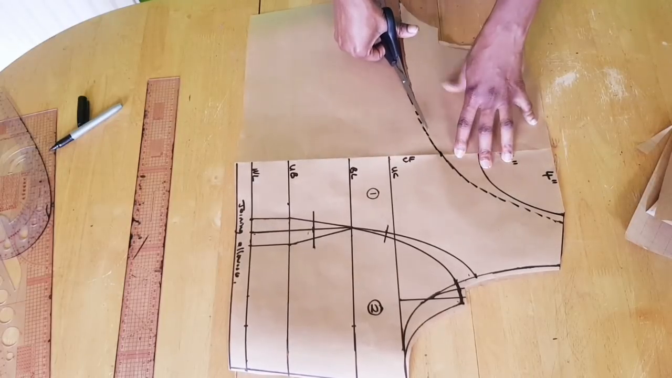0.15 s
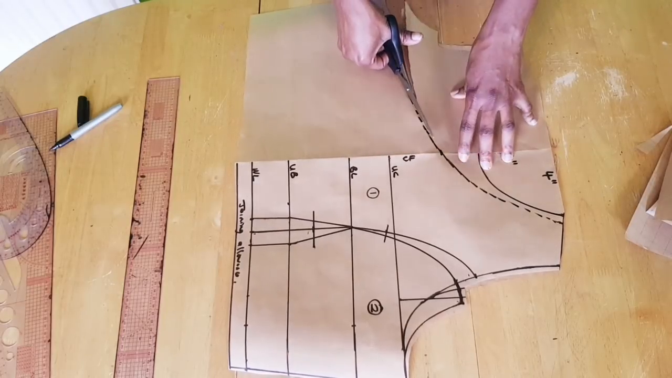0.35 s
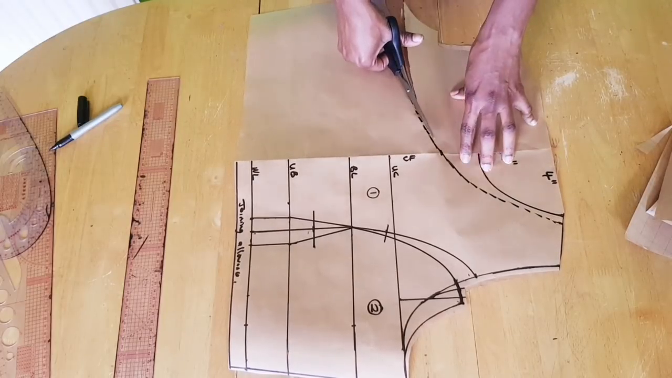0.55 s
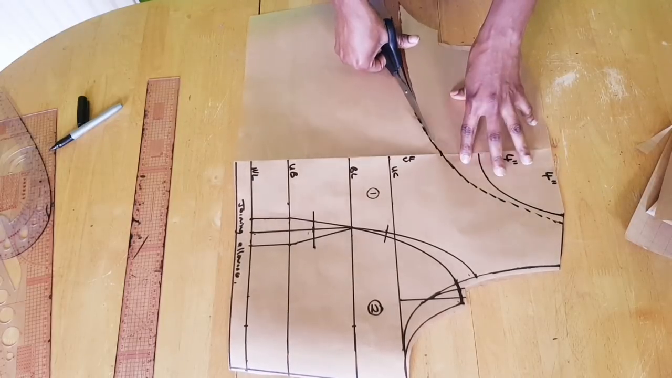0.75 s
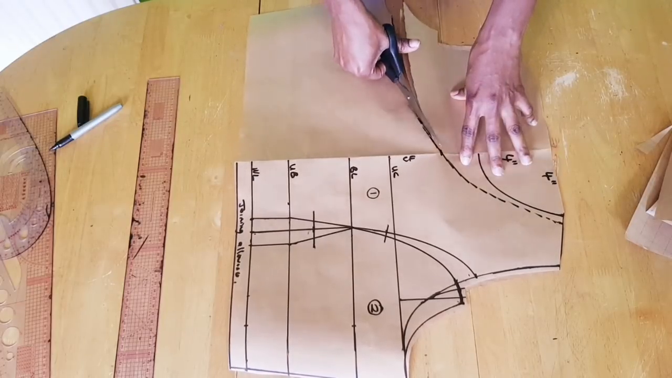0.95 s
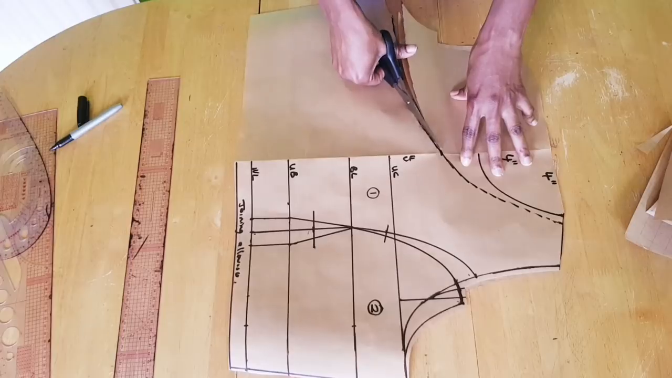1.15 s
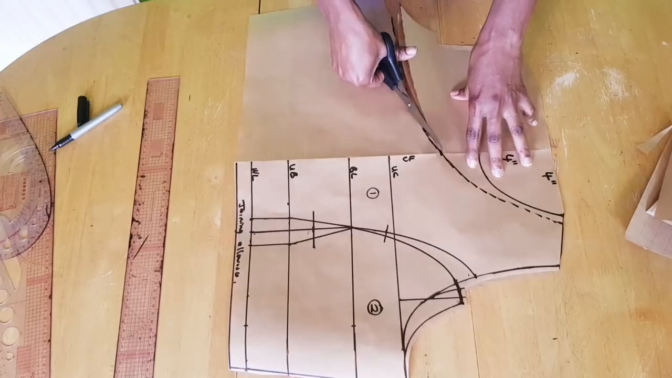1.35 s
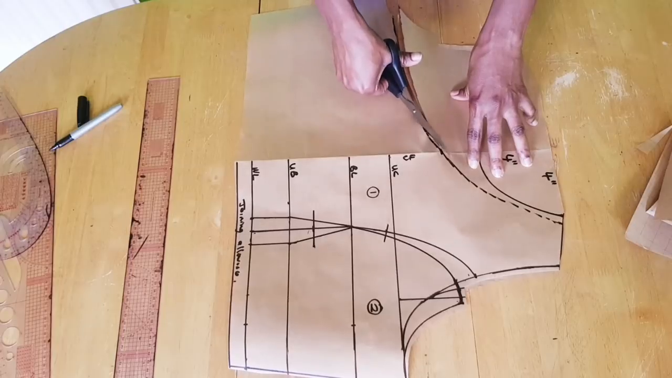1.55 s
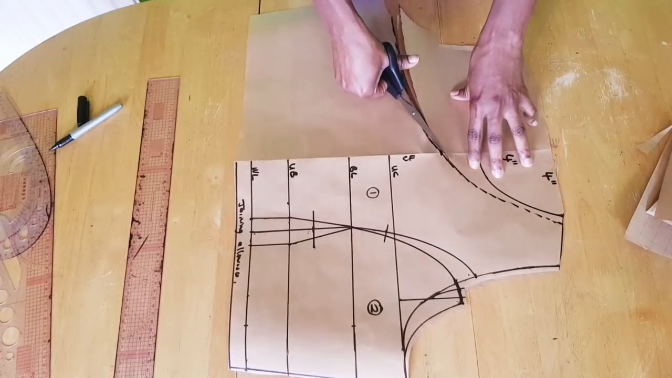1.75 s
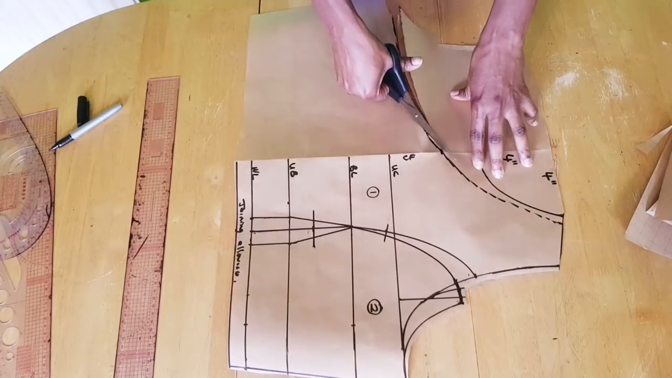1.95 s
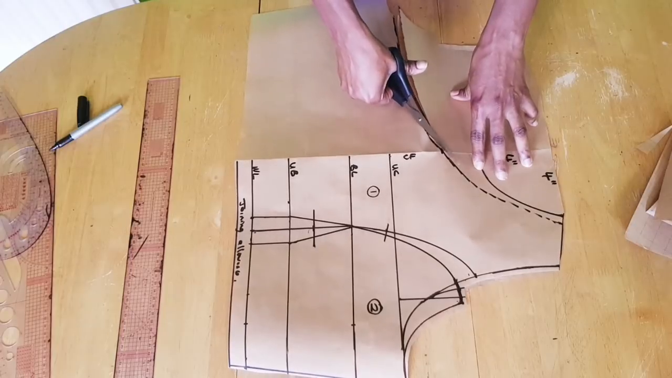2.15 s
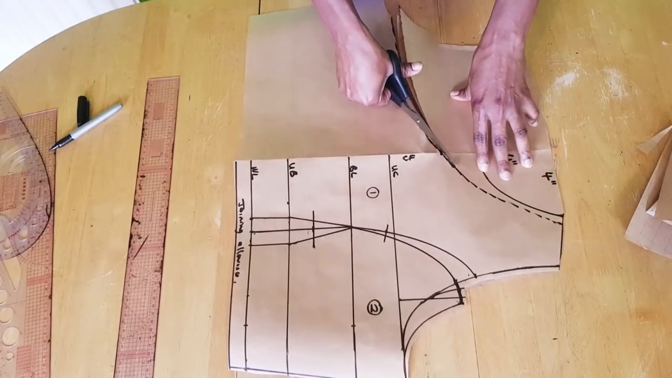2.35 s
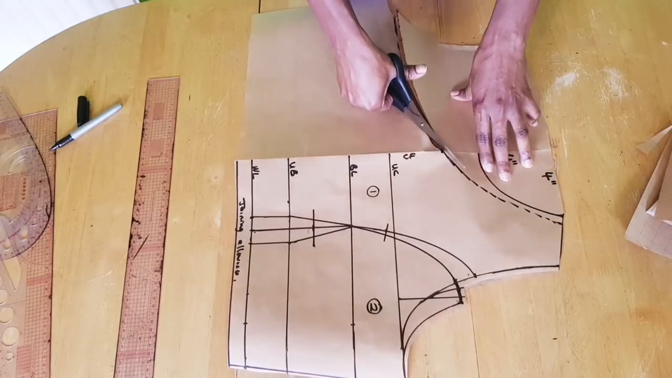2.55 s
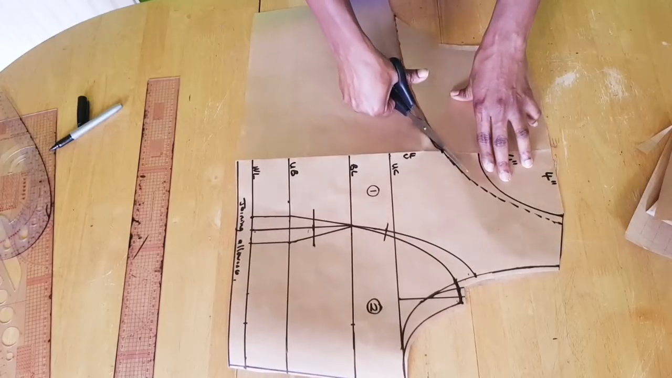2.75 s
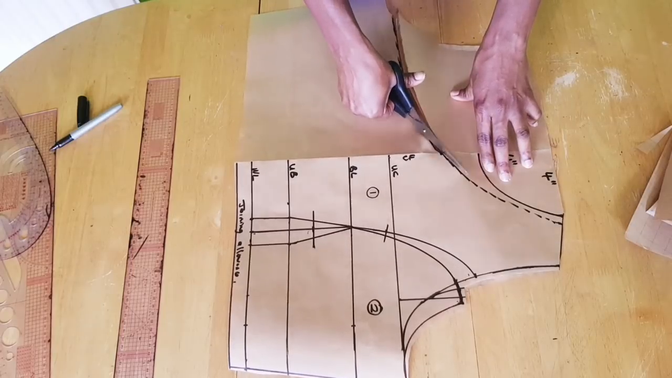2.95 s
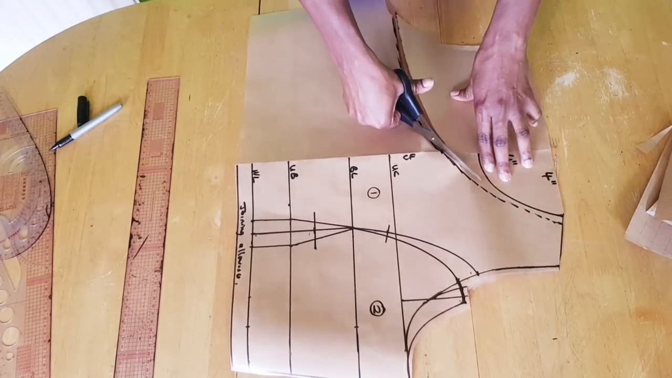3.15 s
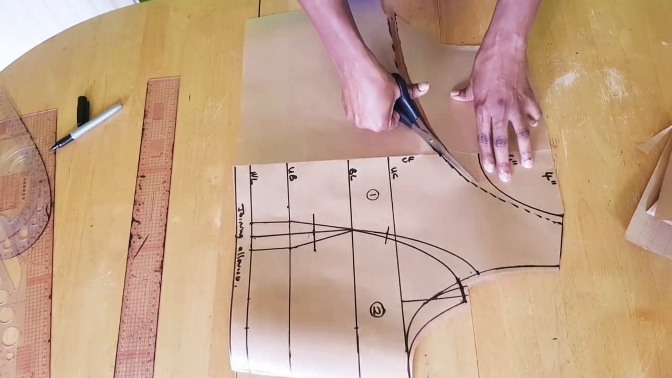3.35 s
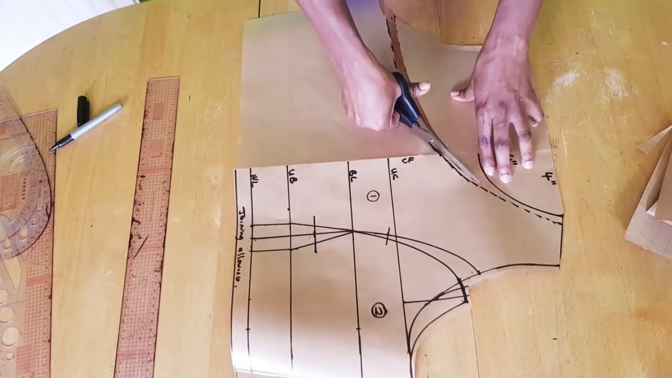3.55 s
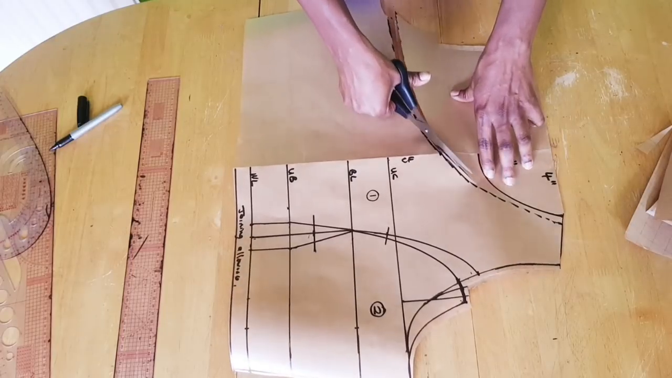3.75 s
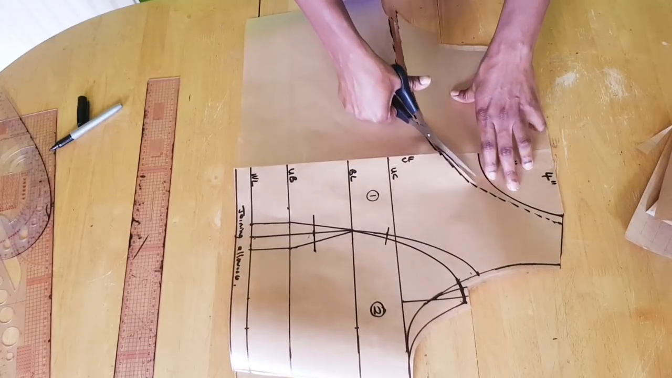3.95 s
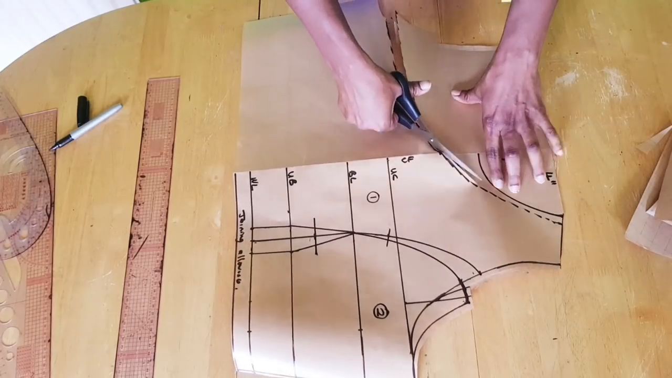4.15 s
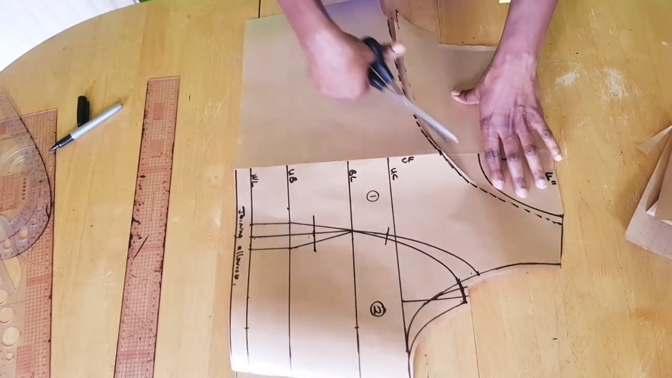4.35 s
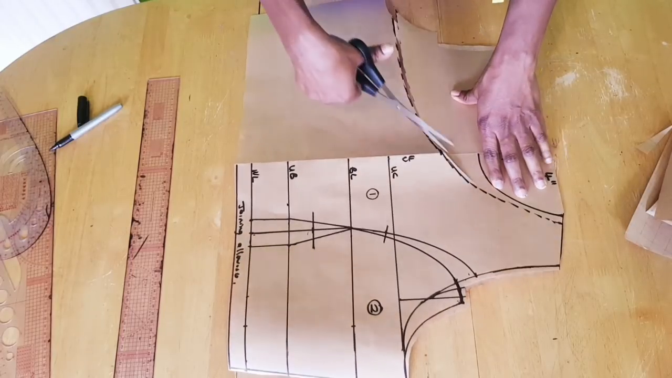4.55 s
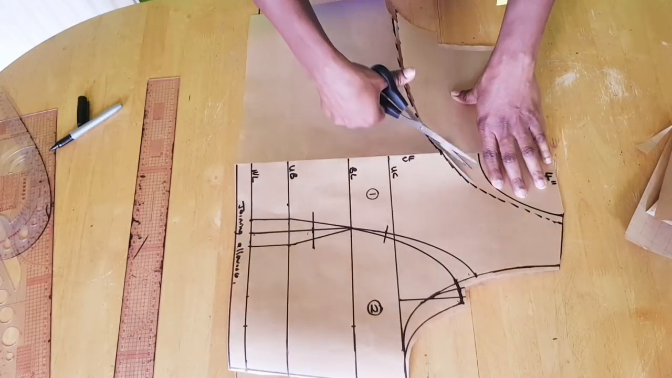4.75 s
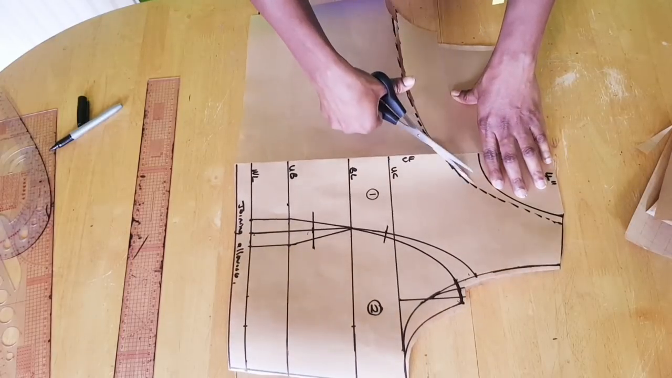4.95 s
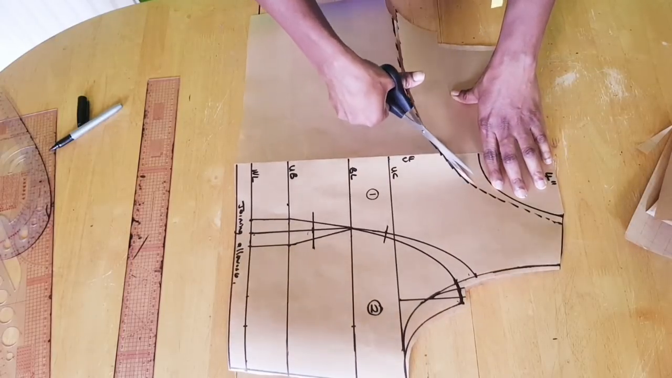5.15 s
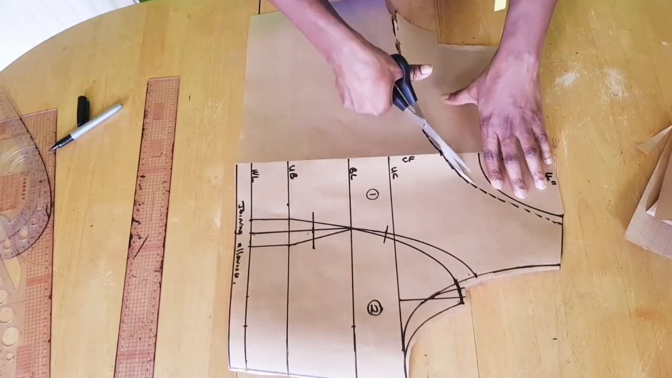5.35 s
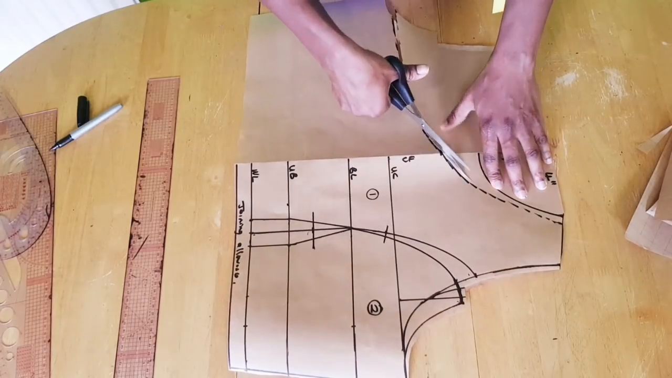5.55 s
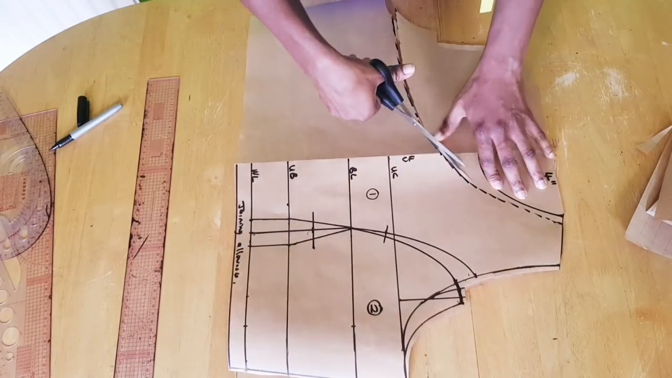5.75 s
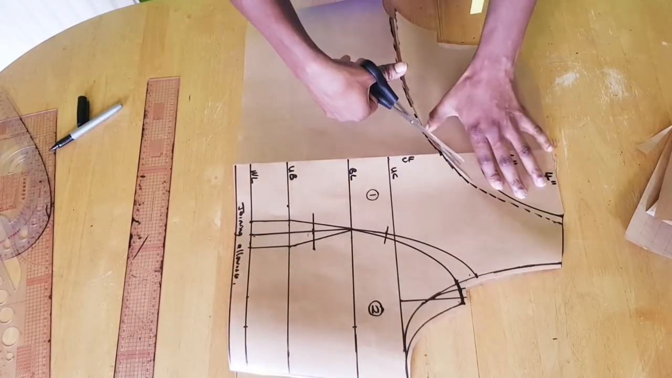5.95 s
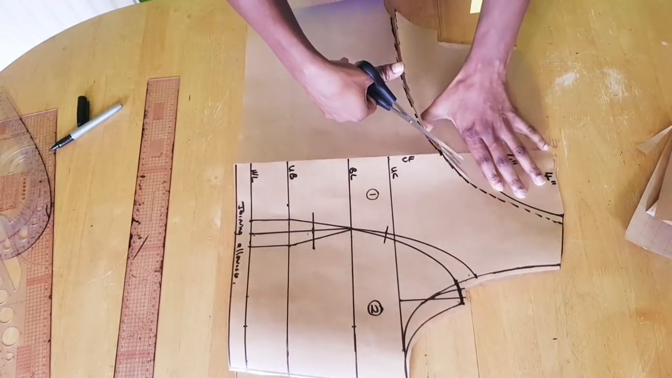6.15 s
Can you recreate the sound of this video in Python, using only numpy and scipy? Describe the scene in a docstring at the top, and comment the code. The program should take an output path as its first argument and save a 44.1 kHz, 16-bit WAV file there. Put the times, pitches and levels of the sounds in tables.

```python
"""Scissors through layered paper

A small hard room, a wooden table, and a two-port phone above the hands as the microphone.
Fibres snap in dense random runs and ring the blades; the drag rings the wood; the sheet slides and pops.
Landing scissors or fingers push the table top into ringing; a deep rumble wavers and groans below.
Slowly changing echoes and a tail answer from the room, over shaped noise as microphone hiss."""
import sys
import numpy as np
from scipy import signal
from scipy.fft import rfft, irfft, next_fast_len
from scipy.io import wavfile
from scipy.ndimage import uniform_filter1d

SR = 44100
rng = np.random.default_rng(int(sys.argv[2]) if len(sys.argv) > 2 else 0)


def transcribe(u):
    """Save the signal u as a 16-bit wav file named by the first command-line argument.

    u: samples, shape (n,) or (channels, n), limited to [-1, 1]; the rate is SR.
    q: integer samples, one column per channel.
    """
    v = np.clip(np.atleast_2d(u).T, -1, 1)
    q = np.round(v * 32767).astype(np.int16)
    wavfile.write(sys.argv[1], SR, q)


N = 272979  # length in samples
STEP = 32  # samples between envelope values


def undb(db):
    """Decibels to gain."""
    return 10 ** (np.asarray(db) / 20)


def unit(x):
    """Scale to rms 1."""
    return x / np.sqrt(np.mean(x ** 2))


def column(table, k):
    """One column of a table as an array."""
    return np.array([row[k] for row in table])


def curve(table):
    """A (t/s, value) table drawn as straight lines, one value per sample."""
    t, value = np.transpose(table)
    return np.interp(np.arange(N) / SR, t, value)


def step_times():
    """Times of the envelope values in seconds."""
    return np.arange(0, N, STEP) / SR


def together(*events):
    """Gain of unrelated sounds added in power; each is (levels/dB, shapes)."""
    power = sum(undb(2 * db) @ shapes ** 2 for db, shapes in events)
    return np.interp(np.arange(N), np.arange(0, N, STEP), np.sqrt(power))


def band(x, hz, width):
    """Two-pole resonance, gain 1 at the centre."""
    b, a = signal.iirpeak(min(hz, SR / 2.2), hz / max(width, 1), fs=SR)
    return signal.lfilter(b, a, x)


def ring(x, modes):
    """Sum of resonances (f/Hz, width/Hz, level/dB), alternating in sign."""
    return sum((-1) ** k * undb(db) * band(x, hz, width) for k, (hz, width, db) in enumerate(modes))


def coloured(shape, points):
    """Noise with a spectrum drawn through (f/Hz, level/dB) points."""
    size = next_fast_len(shape[-1])
    hz, db = np.transpose(points)
    bins_hz = np.arange(1, size // 2 + 2) * SR / size
    gain = undb(np.interp(np.log(bins_hz), np.log(hz), db))
    return irfft(rfft(rng.standard_normal(shape), size) * gain, size)[..., :shape[-1]]


def snaps(rate_hz, spread_db, burst_hz, burst_db):
    """Fibres that let go at random moments, a few much louder, in uneven bursts."""
    chance, sign, loudness = rng.random((3, N))
    size = np.minimum(-np.log(1 - loudness), 4)
    clicks = (chance < rate_hz / SR) * np.sign(sign - .5) * undb(spread_db * size)
    hold = max(int(SR / burst_hz), 1)
    held = rng.standard_normal(N)[np.arange(N) // hold]
    return clicks * undb(burst_db * uniform_filter1d(held, hold))


# Microphone hiss, relative spectrum: f/Hz, level/dB
HISS_SPECTRUM = [(18, -42), (30, -4.5), (71, 4), (284, -10), (532, -13), (1050, -16.5), (2550, -24),
                 (6370, -16.5), (8720, -22.5), (12600, -13), (15500, -15)]


def hiss():
    """Noise floor of the two microphone ports: independent shaped noise in each."""
    return unit(coloured((2, N), HISS_SPECTRUM)) * undb(-69)


# Decay time of the room: f/Hz, time to fall 60 dB/s
DECAY_TIMES = [(150, 0.33), (500, 0.31), (1500, 0.45), (4000, 0.48), (10000, 0.35)]
# Echoes from the nearest surfaces: delay/ms, level/dB
NEAREST_SURFACES = [(5.5, -10.5), (12, -5), (21, -9)]
TAIL_DB, ALIKE_HZ = 3., 476  # tail energy; the ports' tails are alike only below this


def answer():
    """The room's reply to one spot: a few echoes and a tail alike in both ports only in the bass."""
    size = int(.5 * SR)
    t = np.arange(size) / SR
    mid, side = rng.standard_normal((2, size))
    b, a = signal.butter(2, ALIKE_HZ, "high", fs=SR)
    side = signal.lfilter(b, a, side)
    noise = np.array([mid + side, mid - side])
    hz, t60 = np.transpose(DECAY_TIMES)
    tail = 0
    for f in 60 * 2. ** np.arange(9):
        decay_s = np.interp(np.log(f), np.log(hz), t60)
        part = band(noise, f, f) * undb(-60 * t / decay_s)
        tail = tail + part * np.sqrt(f / np.sum(part ** 2))
    tail *= np.clip(t * 250, 0, 1)  # builds up over 4 ms
    reply = undb(TAIL_DB) * tail / np.sqrt(np.sum(tail ** 2) / 2)
    skews = rng.integers(0, 24, (len(NEAREST_SURFACES), 2))  # samples, one per port
    for (ms, db), skew in zip(NEAREST_SURFACES, skews):
        reply[[0, 1], int(ms * SR / 1000) + skew] += undb(db)
    return reply


SPOTS = 30  # spots the hands pass through
LEFT_DB, LEFT_LAG = 1, 3  # left port up and right port down by this/dB; longest left delay/samples


def room(near, far):
    """Hands and scissors keep moving, so the sound glides from one spot's reply to the next."""
    out, hop = np.zeros((2, 2 * N)), N // SPOTS + 1
    near, far = np.pad([near, far], [(0, 0), (hop, 2 * hop)])
    fade = np.hanning(2 * hop)
    for k in range(SPOTS + 1):
        part = slice(k * hop, (k + 2) * hop)
        lag = rng.integers(LEFT_LAG + 1)
        wet = signal.fftconvolve((far[part] * fade)[None], answer(), axes=1)
        out[:, k * hop:][:, :wet.shape[1]] += wet
        direct = near[part] * fade
        out[0, k * hop + lag:][:2 * hop] += undb(LEFT_DB) * direct
        out[1, part] += undb(-LEFT_DB) * direct
    return out[:, hop:hop + N]


# Level of the deep bass rumble: t/s, level/dB before the stand
DEEP_LEVEL = [(0, -87), (.5, -78), (.6, -48), (.79, -88), (1.3, -63), (1.45, -72), (1.75, -71), (2.05, -60),
              (2.6, -53.5), (3.0, -60), (3.35, -66), (3.6, -86), (3.93, -57), (4.05, -70.5), (4.35, -68),
              (4.72, -69), (5.0, -83.5), (5.13, -62.5), (5.45, -77), (6.08, -82), (6.15, -42), (6.19, -60)]
MOVE_GROAN_DB, GROAN_REST_DB = -19, -84  # groan relative to a move's drag; groan at rest
KNOCK_GROAN_DB, KNOCK_DEEP_DB = -19, -27  # groan and deep rumble relative to a landing
KNOCK_CREST_S = 0.046  # from the landing to the crest of both


def rumble():
    """Deep rumble wavers and swells after landings; a groan follows each stroke, drag and landing."""
    deep = ring(rng.standard_normal(N), [(47, 14, 7.5), (74, 18, -7), (101, 7.2, -7)])
    groan = ring(snaps(300., 2.6, 15.0, 1.1), WOOD_MODES[:4])
    landing_s, landing_db = column(LANDINGS, 0), column(LANDINGS, 1)
    since = np.maximum(step_times() - landing_s[:, None], 0) / KNOCK_CREST_S
    after = since * np.exp(1 - since)
    groan_gain = together((column(CUTS, 8), strokes(True, fall_db_s=167)),
                          (column(SHIFTS, 4) + MOVE_GROAN_DB, moves(0)),
                          (landing_db + KNOCK_GROAN_DB, after)) + undb(GROAN_REST_DB)
    deep_gain = together((landing_db + KNOCK_DEEP_DB, after)) + undb(curve(DEEP_LEVEL))
    return unit(band(deep, 55, 60)) * deep_gain + unit(groan) * groan_gain


# Scissors or fingers landing on the wood: t/s, peak level/dB before the room, time to the push's peak/ms
LANDINGS = [(0.05, -59, 0.15), (0.135, -82, 0.23), (0.247, -43, 1), (0.28, -47.5, 0.25), (1.54, -41, 1),
            (1.812, -34.5, 1), (1.829, -38, 0.21), (2.142, -30.5, 1), (2.926, -31, 0.52), (3.138, -36.5, 1),
            (4.745, -33, 0.34), (4.766, -34, 0.18), (4.784, -50.5, 0.42), (5.899, -67, 0.41),
            (6.119, -65, 0.36), (6.14, -49, 0.45)]
# Resonances of the table top: f/Hz, width/Hz, level/dB
WOOD_MODES = [(105.5, 37, -6.5), (145, 24, -1.5), (200.2, 16.2, 1.5), (279.9, 8.3, 3.5), (367, 98, -3.5),
              (612, 120, 4.5), (814, 50, 1.5), (1547, 510, 2.5), (1900, 200, 5), (2705, 360, -23.5)]


def knocks():
    """Each landing is a brief push on the wood that rings the table top."""
    out, t = np.zeros(N + 8192), np.arange(8192) / SR
    spots = rng.standard_normal((len(LANDINGS), len(WOOD_MODES)))
    for (s, db, ms), spot in zip(LANDINGS, spots):
        push = t * np.exp(-t * 1000 / max(ms, .05))
        # the spot that is hit favours some modes
        modes = [(hz, width, level + 2.0 * z) for (hz, width, level), z in zip(WOOD_MODES, spot)]
        thud = ring(push, modes)
        out[int(s * SR):][:8192] += undb(db) * thud / np.abs(thud).max()
    return out[:N]


# Paper pops and pivot ticks: t/s, peak level of the main colour/dB before the room, centre f/Hz,
# width (2 x bandwidth / centre, held within 0.2-3), crackle level/dB re main, share sent round the room/dB
PAPER_POPS = [(.145, -46, 2895, 0.62, -3.5, 2.5), (0.5146, -51, 2060, 1.1, 1.5, -5.5),
              (0.6418, -24, 2760, 0.37, -7, -21), (.727, -24.5, 3300, 0.91, -11, -3),
              (0.7815, -31, 2530, 2.3, -5, -1.5), (0.879, -38.5, 3380, 1.1, -23, -4),
              (.996, -40.5, 3400, 1.3, -19, -1.5), (1.259, -39, 3600, 1.2, -1.5, -0.5),
              (1.6258, -24.5, 2176, 2, -14.5, -18), (2.355, -39, 5460, .98, -0.5, -12),
              (2.3645, -31.5, 3000, 2.1, -10.5, -11.5), (2.383, -39, 2196, 1.3, -1.5, -2.5),
              (2.4162, -31, 2600, 1.3, -2, -7), (2.4398, -28.5, 2194, 2.24, 5.5, -1),
              (2.4716, -21, 1943, 1, 6, -1), (2.903, -32, 2970, 0.37, -25, -8),
              (2.9198, -28, 2400, 1.1, 0.5, -5), (3.439, -28, 2240, 2.1, 0, -4.5),
              (3.7187, -20.5, 3080, 1.5, 2, -2.5), (4.254, -25, 3070, 2, -5.5, -1),
              (4.8182, -34.5, 4380, .95, 3, -12), (4.8245, -35, 2070, 1.45, 11.5, -4),
              (5.6982, -44.5, 6310, 0.71, 3, -2), (6.0997, -51, 2920, 1.4, -6, 4.5)]
# Colour of the crackle in a pop: f/Hz, width/Hz, level/dB
CRACKLE_MODES = [(4870, 4300, -1.5), (7930, 1400, 4.5), (10000, 4400, 0), (14500, 4850, -4)]
POP_MS = 2.2  # decay of the spray


def pops():
    """Short cracks coloured by the patch of paper that buckles; rows: towards the phone, the walls."""
    out, t = np.zeros((2, N + 2048)), np.arange(2048) / SR
    shape = (1 - np.exp(-t * 2500)) * np.exp(-t * 1000 / POP_MS)
    crest = 1. * (shape == shape.max())  # one click at the loudest moment
    noises = rng.standard_normal((len(PAPER_POPS), 2, 2048))
    for (s, db, hz, width, crackle_db, room_db), noise in zip(PAPER_POPS, noises):
        patch = [(hz, hz * np.clip(width, .2, 3) / 2, 0)]
        pop = 0
        for spray, gain_db, colour in zip(noise * shape, (0, crackle_db), (patch, CRACKLE_MODES)):
            # the phone hears a spray of small snaps; the walls, all round, get its even colour
            both = ring(ring(np.array([0.42 * spray + crest, crest]), colour), colour)
            both[1] *= np.std(both[0]) / np.std(both[1])
            pop = pop + undb(gain_db) * both / np.abs(both[0]).max()
        out[:, int(s * SR):][:, :2048] += undb([[db], [db + room_db]]) * pop
    return out[:, :N]


# Closing strokes of the blades: bite t/s, swell/s, bite level/dB re crest, drag lingers/s, then
# levels/dB before the scene's mix: shearing, blade drag on the wood, sheet, grit, table groan
CUTS = [(.555, 0.1, 2, 0.023, -34, -33.5, -42, -48.5, -53.5),
        (1.059, 0.077, -5.5, 0.032, -28.5, -31.5, -35, -41.5, -52.5),
        (1.57, 0.065, -12.5, 0.0099, -29.5, -32, -39, -42, -52.5),
        (2.102, 0.1, -15.5, 0.045, -28.5, -34, -37, -39.5, -46),
        (2.68, 0.073, -10.5, 0.016, -24, -30, -29.5, -34, -43),
        (3.225, 0.096, -4.5, 0.02, -29.5, -34, -37, -38.5, -50.5)]
BITE_S, SILENT_DB = 0.019, -24  # a stroke jumps in from this level re crest, then swells


def strokes(lingers, fall_db_s):
    """Shape of each stroke: bite, swell, crest, fall (gain, one row per stroke)."""
    shapes = []
    for s, swell, bite_db, linger, *_ in CUTS:
        t = step_times() - s
        rise_db = np.interp(t, [-.05, 0, BITE_S, max(swell, 2 * BITE_S)], [-150, SILENT_DB, bite_db, 0])
        shapes.append(rise_db - fall_db_s * np.maximum(t - swell - lingers * linger, 0))
    return undb(shapes)


# Scissors pushed on, sheet shifted: start t/s, rise/s, hold/s, sag/(dB/s), then
# levels/dB before the scene's mix: blade drag, edge scraping, sheet, grit
SHIFTS = [(0, 0.0017, 0.049, 55, -49, -56, -56.5, -64), (0.074, 0.069, 0.034, 30, -51, -60.5, -54, -57),
          (0.178, 0.041, .14, -9, -61.5, -59.5, -57.5, -61), (0.514, 0.03, 0.057, -4, -46.5, -48, -55, -61),
          (0.759, 0.056, .22, 43, -42.5, -49.5, -52.5, -57), (1.217, 0.11, 0.028, 20, -45, -60, -54, -57),
          (1.306, 0.039, 0.299, 60, -49.5, -47.5, -48.5, -53),
          (1.786, 0.036, 0.085, 22, -45.5, -56.5, -57, -60),
          (1.868, 0.059, .14, 84, -77, -51.5, -53.5, -58),
          (2.335, 0.031, 0.057, 32, -45.5, -44, -43, -42.5),
          (2.418, 0.027, 0.13, 63, -52.5, -48, -38.5, -60), (2.876, 0.044, 0.044, 80, -45.5, -47, -45, -44),
          (2.975, 0.034, 0.11, 10, -60, -51, -53, -56), (3.142, 0.037, 0.034, 74, -59.5, -67, -64, -68.5),
          (3.441, 0.013, 0.051, 120, -43.5, -48, -44, -47.5),
          (3.522, 0.038, 0.069, 40, -56.5, -56.5, -69, -74),
          (3.587, 0.03, 0.085, -18, -74, -53, -46.5, -51),
          (3.707, 0.0092, 0.15, 74, -54, -50.5, -43.5, -47), (3.897, 0.17, 0.01, 76, -53, -50, -49, -52.5),
          (4.126, 0.031, 0.027, 58.5, -66, -45.5, -46.5, -54),
          (4.174, 0.074, 0.064, 145.5, -56, -45, -42, -42.5),
          (4.745, 0.021, 0.024, 62.5, -40, -51, -63, -65),
          (4.806, 0.0071, 0.15, 256, -48, -72.5, -43, -46.5),
          (5.185, 0.053, .02, 59.5, -105, -87, -65, -61), (5.42, 0.19, .04, 67, -96.5, -77, -67, -66),
          (5.678, 0.014, 0.1, 41, -89, -89, -64, -54), (5.734, 0.031, 0.086, 96, -76.5, -68, -51, -63),
          (5.867, 0.044, 0.04, 62, -58, -79, -72, -75), (6.078, 0.096, 0.046, 10, -59.5, -63, -54, -59.5)]
FOOT_DB, STOP_DB_S = -7.5, 377  # level at the start re crest; fall after the hold


def moves(extra_sag_db_s):
    """Shape of each move: rise, sagging hold, stop (gain, one row per move)."""
    shapes = []
    for s, rise, hold, sag, *_ in SHIFTS:
        t = step_times() - s
        rise_db = np.interp(t, [-.06, 0, rise], [-150, FOOT_DB, 0])
        sag_db = (sag + extra_sag_db_s) * np.clip(t - rise, 0, hold)
        shapes.append(rise_db - sag_db - STOP_DB_S * np.maximum(t - rise - hold, 0))
    return undb(shapes)


# Colour of the sliding sheet, the last two rows for the fine grit: f/Hz, width/Hz, level/dB
SHEET_MODES = [(1970, 200, -29.5), (3300, 2540, -1), (4520, 3100, 0), (7180, 1600, -4), (10220, 2500, -7.5),
               (14700, 2900, -9)]


def sheet(cut, move):
    """The sheet slides over the wood: dense small snaps, with a separate finer, higher grit."""
    grit = snaps(6000., 3., 100., 3.)
    slide = unit(ring(grit, SHEET_MODES[:-2]))
    slide *= together((column(CUTS, 6), cut), (column(SHIFTS, 6), move))
    fine = unit(band(ring(grit, SHEET_MODES[-2:]), 12000, 9000))
    fine *= together((column(CUTS, 7), cut), (column(SHIFTS, 7), move))
    return slide + fine


# Low ring of the blade drag: f/Hz, width/Hz, level/dB
LOW_DRAG_MODES = [(401.3, 72.5, -2.5), (508.8, 26, 1.5), (506.6, 14, 4.5), (583.3, 43.5, 0)]
# High ring of the blade drag: f/Hz, width/Hz, level/dB
HIGH_DRAG_MODES = [(760.5, 86, 2.5), (800, 55, 5.5), (904, 110, -5.5)]
# High ring against low ring: t/s, level/dB
HIGH_DRAG_SHARE = [(0, -15), (1.1, -8), (1.65, -1.5), (2.75, 2), (3.3, 1), (4.2, -6.5), (4.8, -1),
                   (5.9, -13)]


def blade_drag():
    """The blades judder along the wood and ring low and high, in shares that shift over time."""
    judder = snaps(1500., 3.93, 40., 1.7)
    low, high = unit(ring(judder, LOW_DRAG_MODES)), unit(ring(judder, HIGH_DRAG_MODES))
    level = together((column(CUTS, 5), strokes(True, fall_db_s=295.5)),
                     (column(SHIFTS, 4), moves(extra_sag_db_s=109.5)))
    return (low + high * undb(curve(HIGH_DRAG_SHARE))) * level


# Resonances of the blades, four lower and three upper: f/Hz, width/Hz, level/dB
BLADE_RING = [(1125, 230, -3.5), (1576, 220, -1.5), (1827, 100, 1.5), (1936, 250, 0), (2280, 580, -2.5),
              (2760, 230, -2), (3140, 250, -5.5)]
# Brightness of the edge scraping, upper against lower ring: t/s, level/dB
SCRAPE_BRIGHTNESS = [(0, -0.5), (.3, 6), (1, 4.5), (2.4, 0.5), (3, 1.5), (3.8, 3.5), (4.25, 1.5),
                     (4.75, -9.5), (5.0, -6.5), (5.8, 8), (6.19, -4)]
TIP_DB, TIP_DB_S = 3, -73.5  # shearing brightness at the bite, and its change over the next 0.15 s


def shearing(cut, move):
    """Fibres snap between the edges and ring the blades; each stroke dulls as it goes."""
    fibres = band(snaps(2000., 3.42, 80., 3.4), 2100, 2400)
    into_stroke = np.clip(step_times() - column(CUTS, 0)[:, None], 0, .15)
    tip = undb((TIP_DB + TIP_DB_S * into_stroke) / 2)  # half up above, half down below
    edge = undb(curve(SCRAPE_BRIGHTNESS)[::STEP] / 2)
    shear_db, scrape_db = column(CUTS, 4), column(SHIFTS, 5)
    lower = unit(ring(fibres, BLADE_RING[:4])) * together((shear_db, cut / tip), (scrape_db, move / edge))
    upper = unit(ring(fibres, BLADE_RING[4:])) * together((shear_db, cut * tip), (scrape_db, move * edge))
    return lower + upper


def cutting():
    """The blades shear and drag while the sheet slides, on shared stroke and move times."""
    cut, move = strokes(False, fall_db_s=324), moves(0)
    return sheet(cut, move) + blade_drag() + shearing(cut, move)


def scene():
    """Everything at the table heard through the room; rumble reaches the phone through its stand."""
    # the cutting sounds go 1.5 dB stronger to the walls than to the phone
    table = undb([[-8.5], [-9.0 + 2]]) * cutting() + knocks() + pops()
    through_stand = rumble() * undb([[.5], [-.5]])  # left port slightly louder
    return room(*table) + through_stand + hiss()


def record(dry):
    """The phone cuts the deepest bass below 37 Hz and the top above 15.8 kHz."""
    low_cut = signal.butter(5, 37, "high", fs=SR, output="sos")
    top_cut = signal.ellip(10, .2, 80, 15800, fs=SR, output="sos")
    return signal.sosfilt(top_cut, signal.sosfilt(low_cut, dry))


dry = scene()
out = record(dry)
transcribe(out)
```